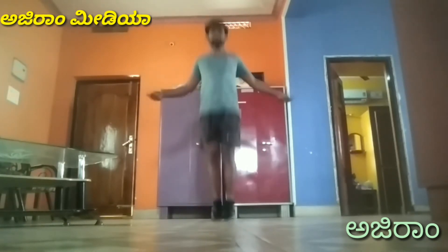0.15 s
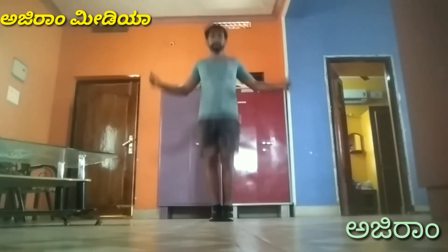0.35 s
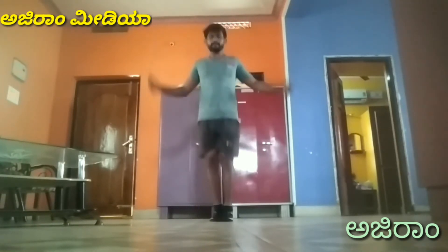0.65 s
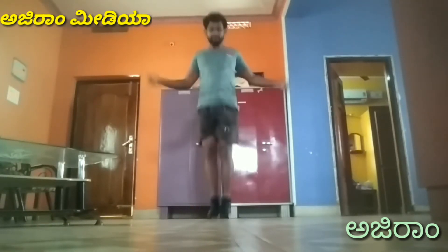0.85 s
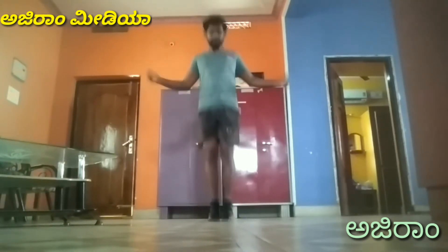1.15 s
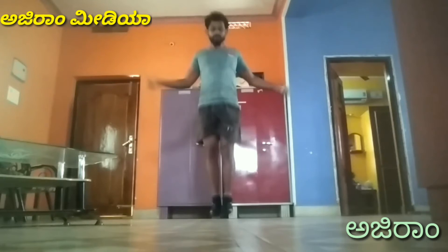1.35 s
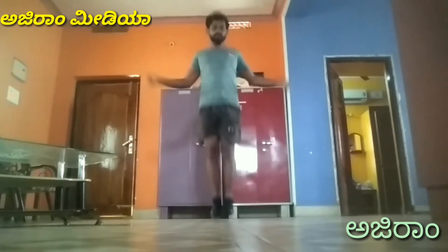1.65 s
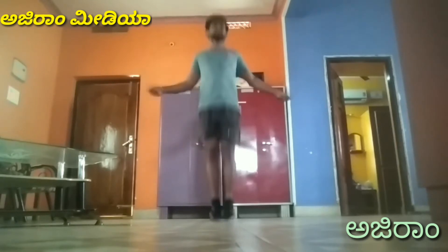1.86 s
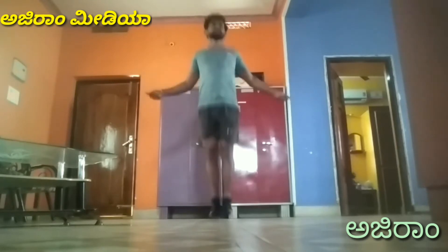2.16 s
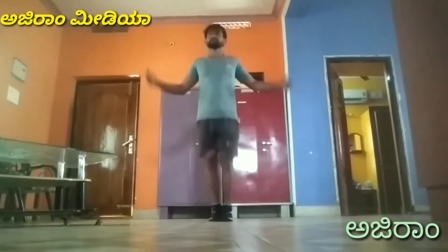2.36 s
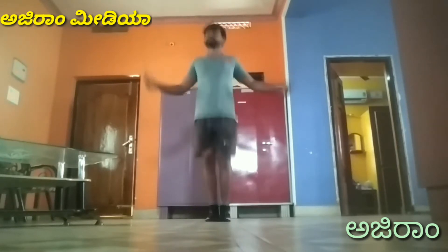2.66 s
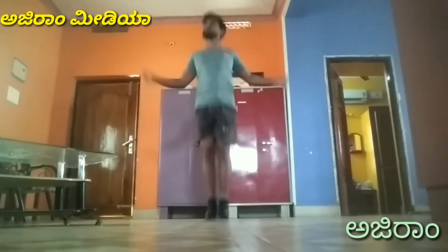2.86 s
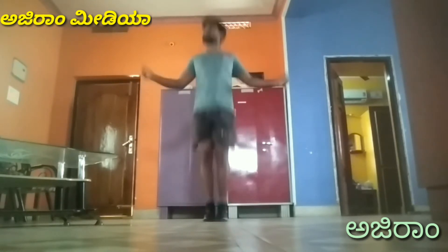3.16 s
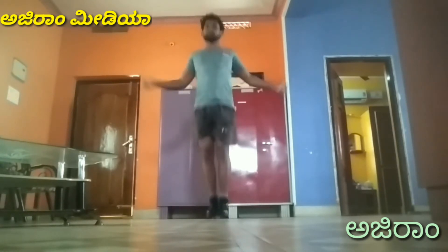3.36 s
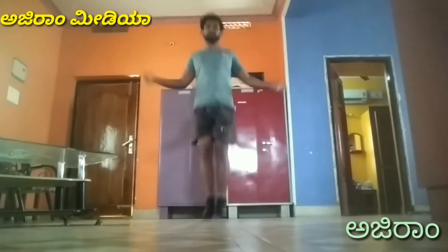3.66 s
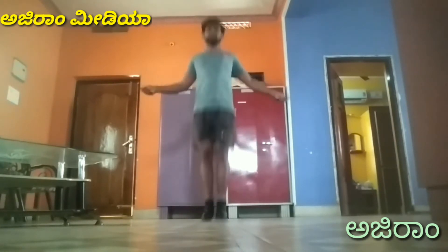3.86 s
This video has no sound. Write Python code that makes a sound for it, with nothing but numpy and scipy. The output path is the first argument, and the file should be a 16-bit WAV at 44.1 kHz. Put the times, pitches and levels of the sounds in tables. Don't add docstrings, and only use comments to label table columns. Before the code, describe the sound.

A skipping rope cracks sharply on hard tiles in a fast, steady indoor rhythm

```python
import sys
import numpy as np
from scipy import signal
from scipy.fft import rfft, irfft, next_fast_len
from scipy.io import wavfile
from scipy.ndimage import uniform_filter1d, map_coordinates

SR = 44100
rng = np.random.default_rng(int(sys.argv[2]) if len(sys.argv) > 2 else 0)


def generate_wav(sig):
    pcm = np.round(np.clip(np.atleast_2d(sig).T, -1, 1) * 32767).astype(np.int16)
    wavfile.write(sys.argv[1], SR, pcm)


def linear_from_db(decibels):
    return 10 ** (np.asarray(decibels, float) / 20)


N = 176400

# floor contact in [s], room tail in [dB], suppressor closes after [s],
# downswing rush in [dB], dull body under the tail in [dB].
CONTACTS = [(0.126, -13, 0.12, -28.5, -12), (.410, -11, 0.13, -30, -12.5), (0.695, -7, 0.14, -35.5, -23.5),
            (0.979, -7, 0.15, -34.5, -21), (1.251, -7, 0.12, -39, -22), (1.541, -6, 0.13958, -34, -17.5),
            (1.827, -12.5, 0.096, -34, -23.5), (2.122, -11.5, 0.13, -42.5, -13),
            (2.393, -9.5, 0.12, -42, -26), (2.696, -13.5, 0.11, -47, -20), (2.967, -12, 0.11, -45, -19.5),
            (3.251, -11.5, 0.12425, -40, -16), (3.535, -9.5, .14, -49, -22.5),
            (3.824, -10.5, 0.13, -39, -20.5)]


def unit(x):
    return x / np.sqrt(np.mean(x ** 2) + 1e-20)


def filtered(x, response):
    m = next_fast_len(N + 8192)
    return irfft(rfft(x, m) * response(np.fft.rfftfreq(m, 1 / SR)), m)[:N]


def noise(colour):
    f, db = np.transpose(colour)
    return unit(filtered(rng.standard_normal(N), lambda hz: linear_from_db(np.interp(np.log(hz + 1), np.log(f + 1), db))))


def bright(colour):
    port_hz, port_q, steepness = 11814, 5.8, 1.432

    def port(hz):
        ratio = hz / port_hz
        return np.abs(1 - ratio ** 2 + 1j * ratio / port_q) ** -steepness

    return unit(filtered(noise(colour), port))


def patchy(x):
    patch_db = 2
    z = signal.stft(x, nperseg=256)[2]
    field = uniform_filter1d(rng.standard_normal(z.shape), size=5, axis=0)
    field = uniform_filter1d(field, size=9, axis=1)
    return unit(signal.istft(z * linear_from_db(patch_db * unit(field)), nperseg=256)[1][:N])


def even(x, size):
    return unit(x / np.sqrt(np.abs(uniform_filter1d(x ** 2, size=size)) + 0.15))


def wobble(rate_hz):
    return map_coordinates(rng.standard_normal(SR + 8), [np.arange(N) * rate_hz / SR])


def tone(pitch_hz, width_hz):
    slow = [filtered(rng.standard_normal(N), lambda f: 1 / (1 + (2 * f / width_hz) ** 4)) for _ in range(2)]
    phase = 2 * np.pi * np.cumsum(pitch_hz) / SR
    return unit(slow[0] * np.cos(phase) + slow[1] * np.sin(phase))


def swells(rows, glide):
    t = np.arange(N) / SR
    gain, weighted_hz = np.full(N, 1e-9), np.zeros(N)
    for start, db, hz, swell_s in rows:
        u = (t - start) / swell_s
        bell = linear_from_db(db) * np.exp(-u ** 2 / 2) + 1e-12
        gain = gain + bell
        weighted_hz = weighted_hz + bell * hz * (1 + glide * np.tanh(u))
    return gain, weighted_hz / gain


def background():
    # frequency in [Hz], level in [dB].
    hiss_colour = [(900, -41), (1600, 16.5), (3000, 11), (6400, 2.5), (9000, -1), (16000, -2.5)]
    # time in [s], level in [dB], pitch in [Hz].
    far_whistle = [
        (1.58, -61, 3117),
        (1.722, -50, 3090),
        (1.799, -51, 3044),
        (1.84, -44, 3065),
        (1.919, -56, 3060),
        (2.02, -45.5, 3030),
        (2.13, -52, 3080),
    ]
    hiss_db = -49
    t = np.arange(N) / SR
    s, db, hz = np.transpose(far_whistle)
    pitch_hz = np.interp(t, s, hz) + 25 * wobble(30)
    far = linear_from_db(np.interp(t, s, db, -120, -120)) * even(tone(pitch_hz, 70), size=900)
    return linear_from_db(hiss_db + 1.47 * wobble(6.27)) * patchy(bright(hiss_colour)) + far


def feet():
    # time in [s], level in [dB], pitch in [Hz], swell in [s].
    thuds = [(0.007, -14, 79, 0.0086), (0.061, -31, 89, 0.015), (0.104, -25.5, 90, 0.014),
             (0.311, -13.5, 74.4, 0.018), (0.353, -46, 98.4, 0.009), (0.402, -24.5, 79, 0.014),
             (0.511, -34, 86.5, 0.014), (0.591, -28, 90, 0.012), (0.632, -31, 93.9, 0.008),
             (0.978, -40.5, 152, 0.007), (1.123, -21.5, 135, 0.013), (1.191, -22, 119.4, 0.007),
             (1.409, -16, 72.3, 0.021), (1.46, -27.5, 90.4, 0.013), (1.516, -22.5, 71, 0.012),
             (1.626, -31.5, 79, 0.01), (1.673, -32.5, 87.4, 0.017), (1.703, -25, 98.7, 0.01),
             (1.751, -21, 101, 0.0068), (1.798, -29.5, 87, 0.026), (1.927, -31.5, 105, 0.0086),
             (2.003, -21.5, 107.5, 0.01), (2.224, -34, 127.3, 0.019), (2.256, -22, 122, 0.0088),
             (2.291, -33.5, 146.8, 0.024), (2.327, -30, 162.5, 0.012), (2.544, -30, 174.6, 0.0097),
             (2.845, -23.5, 88, 0.01006), (2.892, -38, 125, 0.016), (2.947, -39, 95, 0.01),
             (3.124, -22, 88, 0.009), (3.173, -32, 89, 0.016), (3.226, -25, 88, 0.0074),
             (3.406, -25, 111, 0.0085), (3.439, -35, 108, 0.008), (3.501, -31, 89, 0.0076),
             (3.687, -16.5, 79, 0.0093), (3.722, -28, 106.7, 0.017), (3.786, -26, 85.2, 0.01),
             (3.93, -34.5, 112.5, 0.01), (3.989, -25.5, 102, 0.0068)]
    # frequency in [Hz], level in [dB].
    rumble_colour = [(20, -40), (60, 19), (150, -2), (280, -7), (600, -57), (1500, -79)]
    murmur_colour = [(20, -35.5), (60, -1), (200, 4.5), (400, -1), (600, -18), (1200, -69)]
    gust_colour = [(30, -13), (70, 7.5), (150, 4.5), (260, -14), (400, -35.5), (900, -70)]
    gust_gain, rumble_db, murmur_db = 0.51, -58.5, -56.5
    t = np.arange(N) / SR
    gain, pitch_hz = swells(thuds, -0.085)
    body = np.sin(2 * np.pi * np.cumsum(0.86 * pitch_hz * (1 + 0.12 * wobble(40))) / SR)
    push = gain * linear_from_db(1.7 * wobble(50) - 1.5) * 0.9 * body
    gust = gust_gain * uniform_filter1d(gain, size=SR // 14) * noise(gust_colour)
    rumble = linear_from_db(rumble_db + 2.726 * wobble(6.985)) * noise(rumble_colour)
    murmur_level_db = murmur_db + 3.5 * np.minimum(t, 2.4) + 2.53 * wobble(5.3)
    murmur = linear_from_db(murmur_level_db) * patchy(patchy(noise(murmur_colour)))
    return push + gust + rumble + murmur


def whistle():
    # time in [s], level in [dB], pitch in [Hz], swell in [s].
    passes = [(0.077, -14, 1148, 0.016), (0.14, -35, 1108, 0.016), (0.164, -27, 1089, 0.01),
              (0.193, -21, 1120, 0.0082), (0.234, -24.5, 1158, 0.012), (0.32, -22, 932, 0.0076),
              (0.363, -17, 1168, 0.012), (0.386, -23, 1043, 0.0071), (0.423, -25, 1018, 0.01),
              (0.61, -21, 907, 0.005), (0.644, -26, 1174, 0.013), (0.669, -32.5, 1104, 0.015),
              (0.7, -29, 1014, 0.015), (0.941, -24, 1069, 0.012), (0.973, -16.5, 1099, 0.0054),
              (1.0, -23.5, 1103, 0.012), (1.054, -30.5, 1020, 0.0052), (1.197, -28.5, 1073, 0.0087),
              (1.236, -26, 1017, 0.0067), (1.482, -16.5, 1075, 0.0053), (1.769, -23.5, 1158, 0.016),
              (1.818, -22, 968, 0.0054), (1.898, -26, 1089, 0.0055), (2.076, -19, 1104, 0.0051),
              (2.182, -30.5, 959, 0.012), (2.375, -26.5, 1070, 0.0064), (2.475, -30.5, 980.5, 0.012),
              (2.599, -29, 888, 0.0075), (2.645, -27.5, 905.4, 0.012), (2.821, -32, 899, 0.02),
              (3.02, -22, 1021, 0.011), (3.158, -25.5, 1005, 0.0066), (3.337, -31, 909, 0.0073),
              (3.436, -25.5, 769.6, 0.012), (3.599, -31.5, 948, 0.0069), (3.75, -29.5, 904, 0.016)]
    # share of full speed, level in [dB], width in [Hz].
    strands = [
        (0.98, 2, 210),
        (.72, -13.5, 178),
    ]
    # time in [s], level in [dB].
    hum_level = [(0, -38), (0.899, -41.5), (2, -40.5), (4, -40.5)]
    # frequency in [Hz], level in [dB].
    air_colour = [(250, -22), (430, -15), (650, -2.5), (930, 3.5), (1150, -2.5), (1400, -14), (2000, -34),
                  (4000, -76)]
    pitch_gain, wet_db, room_t60_s = 0.0405, -7, 0.51
    hum_slow_db, hum_fast_db = 2, 2.5
    gain, pitch_hz = swells(passes, pitch_gain)
    song = sum(linear_from_db(db) * even(tone(share * pitch_hz, width_hz), size=130) for share, db, width_hz in strands)
    direct = gain * linear_from_db(1.8 * wobble(48) - 6.5) * song
    room_t = np.arange(SR // 2) / SR
    room = rng.standard_normal(SR // 2) * linear_from_db(-60 * room_t / room_t60_s)
    wet = signal.fftconvolve(direct, room / np.linalg.norm(room))[:N]
    s, db = np.transpose(hum_level)
    hum_db = np.interp(np.arange(N) / SR, s, db) + hum_slow_db * wobble(14) + hum_fast_db * wobble(50)
    return direct + linear_from_db(wet_db) * wet + linear_from_db(hum_db) * noise(air_colour)


def rush():
    # frequency in [Hz], level in [dB].
    haze_colour = [(1400, -44), (1900, 13.5), (2600, 13.5), (3600, 1.5), (6000, -14)]
    lead_s, rise_s, climb_s = 0.085, 0.017, 0.031
    top_hz, climb_share, width_hz = 1386, 0.3, 350
    haze_db, haze_db_per_db = -54.5, 2.33
    t = np.arange(N) / SR
    gain, haze, pitch_hz = np.zeros(N), np.zeros(N), np.full(N, top_hz)
    for contact, _, _, db, _ in CONTACTS:
        u = t - contact + lead_s
        shape = np.clip(u / rise_s, 0, 1) * linear_from_db(-130 * np.maximum(t - contact, 0))
        gain = gain + linear_from_db(db) * shape ** 2
        haze = haze + linear_from_db(haze_db + haze_db_per_db * (db + 34.5)) * shape
        pitch_hz = np.where(u > 0, top_hz * (1 - climb_share * np.exp(-np.abs(u) / climb_s)), pitch_hz)
    swish = gain * linear_from_db(3.6 * wobble(70)) * even(tone(pitch_hz, width_hz), size=130)
    return swish + haze * noise(haze_colour)


def slaps():
    # time in [s], peak in [dB], T60 in [s].
    lashes = [(0.1253, 1, 0.0186), (0.1274, -12, 0.0209), (0.1368, -1, 0.008), (0.1531, -3, 0.014),
              (0.4106, 3, 0.015), (0.4221, -12, 0.022), (0.4333, -5, 0.019), (0.4387, 3.5, 0.011),
              (0.6921, 1, 0.041), (0.7036, -0.5, 0.0168), (0.7133, -14, 0.009), (0.7197, -15, 0.023),
              (0.9773, 8.5, 0.018), (0.9793, 6, 0.017), (0.9893, -4, 0.026), (1.0049, -3, 0.04),
              (1.2482, -8, 0.0159), (1.2503, -0.5, 0.014), (1.2698, -6, 0.011), (1.2733, -2.5, 0.022),
              (1.5445, 5, 0.0302), (1.5499, 1, 0.028), (1.56, -6, 0.016), (1.5638, 3, 0.014),
              (1.8287, 2.5, 0.014), (1.8306, -7, 0.013), (1.8401, -12, 0.013), (1.8565, -10, 0.014),
              (2.1215, 4.5, 0.016), (2.133, -2, 0.038), (2.1384, -18, 0.009), (2.1472, -17, 0.0249),
              (2.3933, -10.5, 0.02), (2.4027, -0.5, 0.01), (2.4143, -16, 0.0193), (2.4191, -17, 0.018),
              (2.6945, -12, 0.232), (2.6966, -23, 0.018), (2.7002, -4.5, 0.0166), (2.7103, -3.5, 0.011),
              (2.9707, -6.5, 0.0193), (2.9773, -10, 0.04), (2.9877, -24, 0.0304), (2.9983, -6, 0.022),
              (3.2515, 6, 0.012), (3.255, -14, 0.03), (3.2681, -5, 0.0134), (3.2817, -13, 0.013),
              (3.5389, -2.5, 0.023), (3.5451, -16, 0.011), (3.5496, -17, 0.019), (3.568, -9, 0.0218),
              (3.8261, 2.5, 0.01), (3.8317, 1.5, 0.013), (3.8365, -13, 0.01), (3.8525, -17, 0.013)]
    # frequency in [Hz], level in [dB].
    crack_colour = [(700, -50), (1300, -5.5), (3000, -6.5), (6000, -9.5), (16000, 5)]
    echo_colour = [(900, -60), (1600, -4.5), (3000, -16.5), (5000, -4.5), (8000, -1.5), (12000, 1),
                   (16000, 5.5)]
    body_colour = [(900, -8.5), (1600, -1.5), (3000, 0), (5000, -1.5), (9000, -5)]
    direct_s = 0.01
    tail_rise_s, lead_s, lead_db = 0.0092, 0.0047, -29.5
    tail_db_per_s, shut_db_per_s, knee_s = 118.5, 329, 0.012
    body_slower = 0.83
    ring_early_s, ring_low_hz, ring_high_hz = 0.013, 9250, 12800
    lump_db, flutter_db, spike_db = 1.3, 0.6, 1.2

    t = np.arange(N) / SR
    power = np.zeros((2, N))
    for start, db, t60_s in lashes:
        late = min(abs(start - row[0]) for row in CONTACTS) > direct_s
        first = round(start * SR)
        span = slice(first, first + SR // 30)
        power[int(late), span] += linear_from_db(2 * (db - 3.5 - 60 * (t[span] - start) / t60_s))
    direct, echoes = np.sqrt(power)

    tail, body = np.zeros((2, N)), np.zeros(N)
    for contact, db, shut_s, _, body_db in CONTACTS:
        u = np.maximum(t - contact, 0)
        past_shut = u - shut_s + [[ring_early_s], [0]]
        closing = shut_db_per_s * knee_s * np.logaddexp(0, past_shut / knee_s)
        fall_db = tail_db_per_s * u + closing
        rise = 1 - 0.8 * np.exp(-(u / tail_rise_s) ** 2) - 0.2 * (u == 0)
        smear = linear_from_db(db + lead_db) * np.exp(-np.abs(t - contact) / lead_s)
        tail += linear_from_db(db - fall_db) * rise + smear
        body += linear_from_db(db + body_db - body_slower * fall_db[1]) * rise

    spikes = np.clip(wobble(800), 0, 2) ** 2
    lumps = linear_from_db(lump_db * wobble(410) + flutter_db * wobble(90) + spike_db * spikes)
    wash = patchy(bright(echo_colour))
    ring = filtered(wash, lambda hz: (hz > ring_low_hz) & (hz < ring_high_hz))
    cracks = direct * even(bright(crack_colour), size=30) + echoes * even(bright(echo_colour), size=30)
    room_tail = lumps * (tail[0] * (wash - ring) + tail[1] * ring)
    return cracks + room_tail + body * patchy(noise(body_colour))


def scene():
    return (background() + feet() + whistle() + rush() + slaps())[None]


def top_cut(x):
    return signal.sosfilt(signal.butter(12, 16470, fs=SR, output="sos"), x)


def record(dry):
    top_hz, edge_hz, leak = 15680, 50, 0.0019
    ceiling, hardness = 1.0, 12
    x = filtered(dry[0], lambda hz: leak + 1 / (1 + np.exp(np.clip((hz - top_hz) / edge_hz, -50, 50))))
    x = x / (1 + np.abs(x / ceiling) ** hardness) ** (1 / hardness)
    return top_cut(x[None])


dry = scene()
out = record(dry)
generate_wav(out)
```